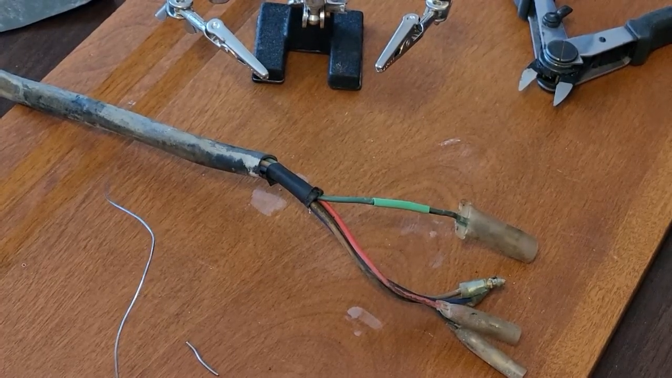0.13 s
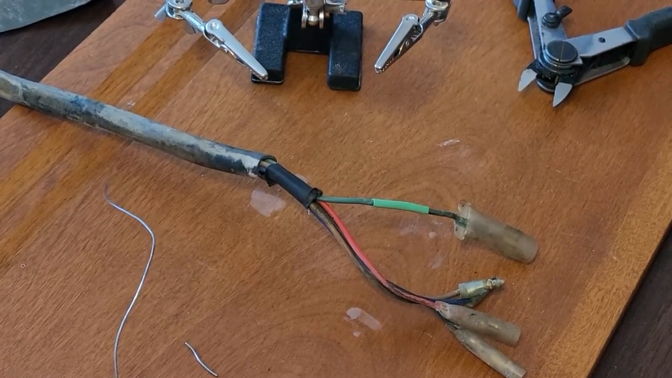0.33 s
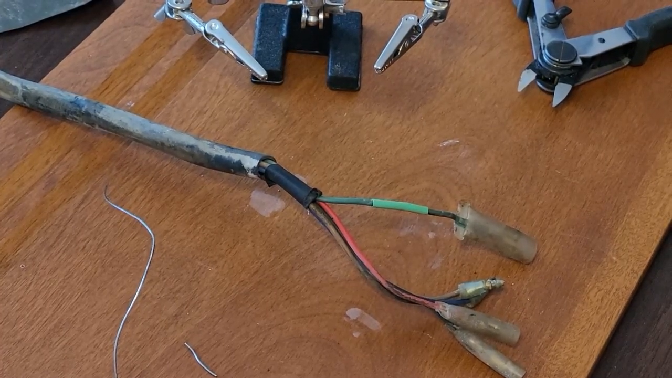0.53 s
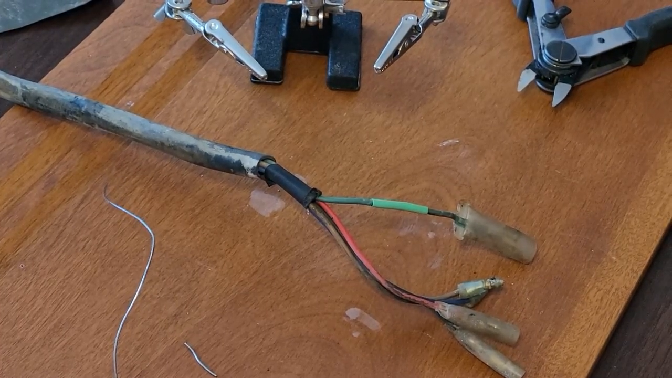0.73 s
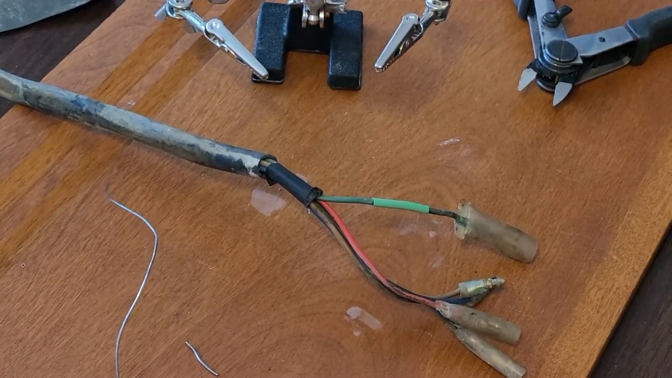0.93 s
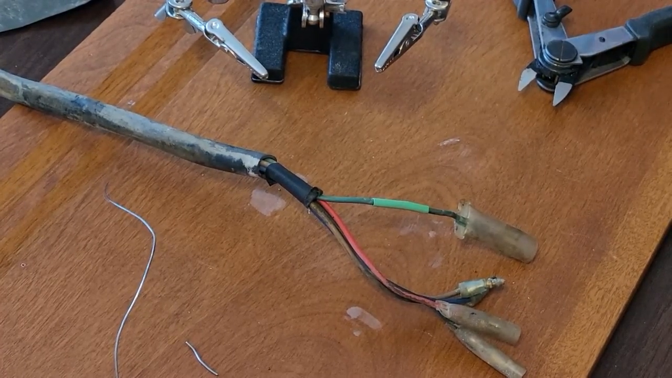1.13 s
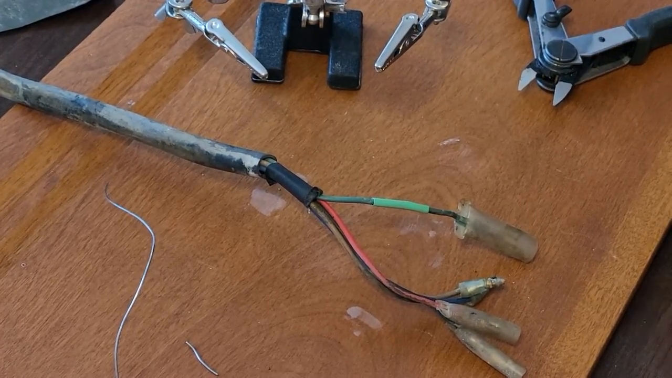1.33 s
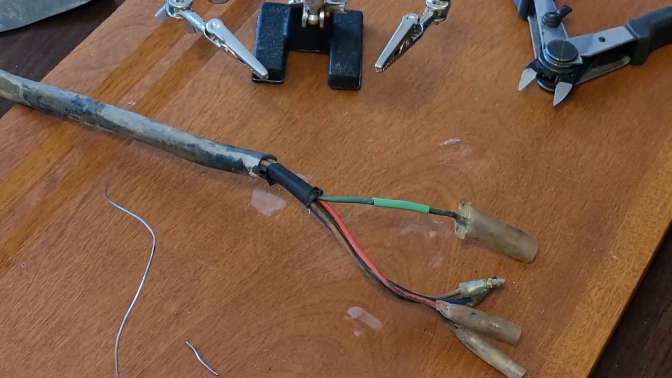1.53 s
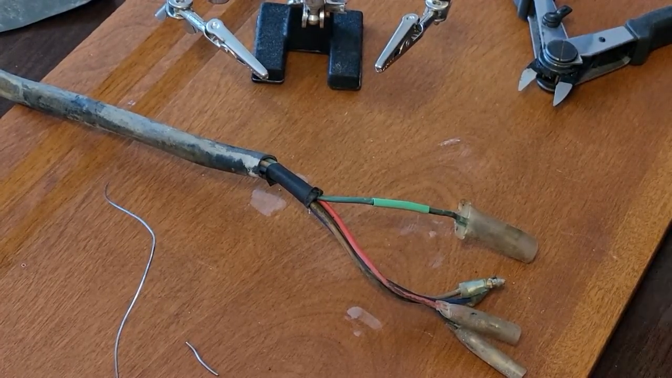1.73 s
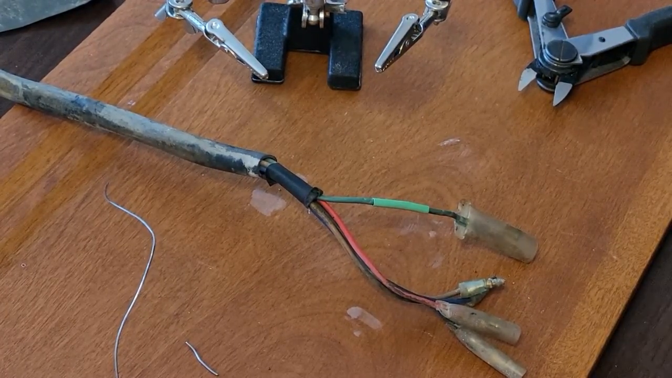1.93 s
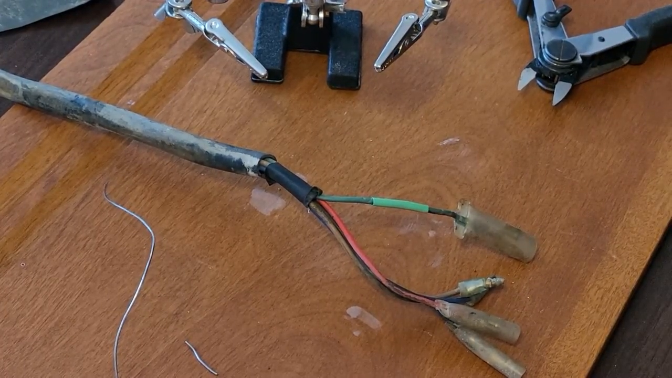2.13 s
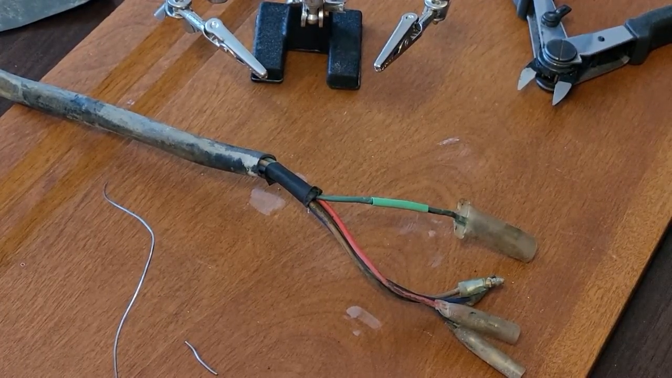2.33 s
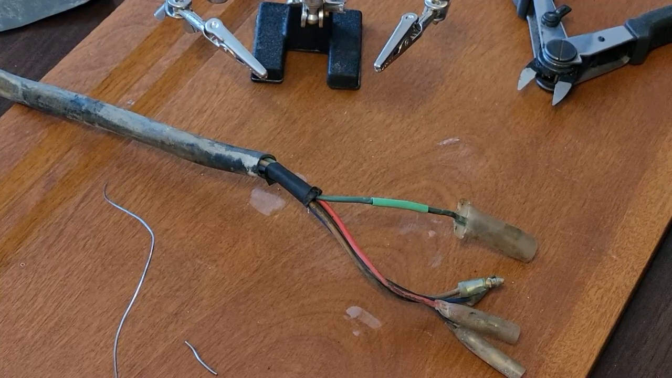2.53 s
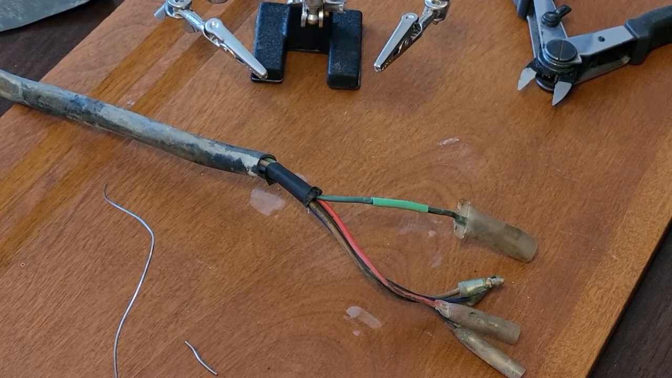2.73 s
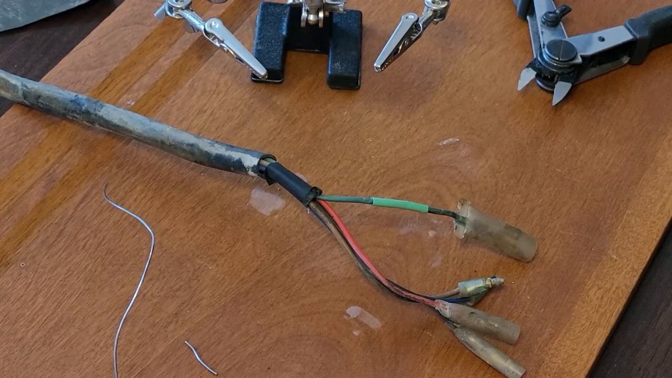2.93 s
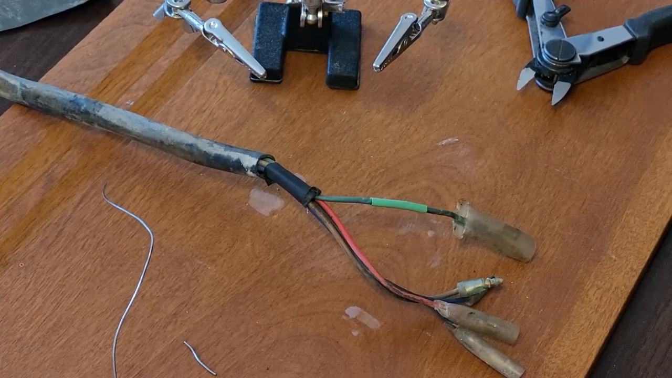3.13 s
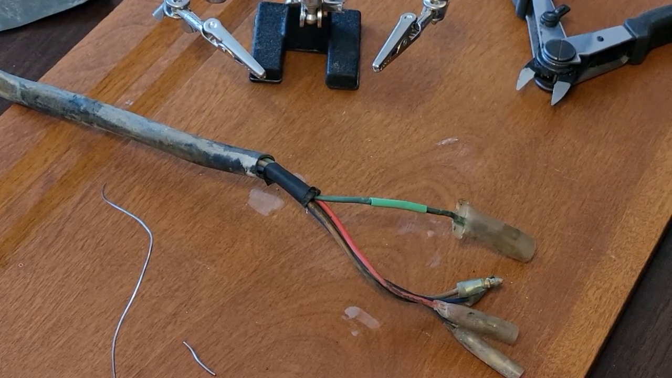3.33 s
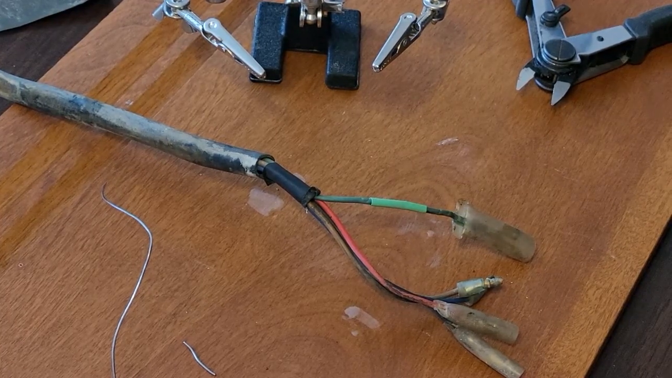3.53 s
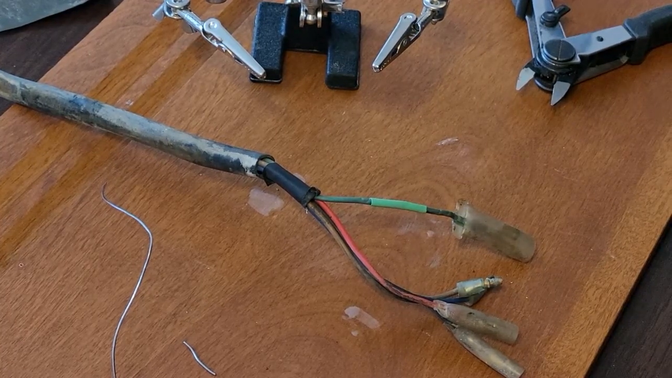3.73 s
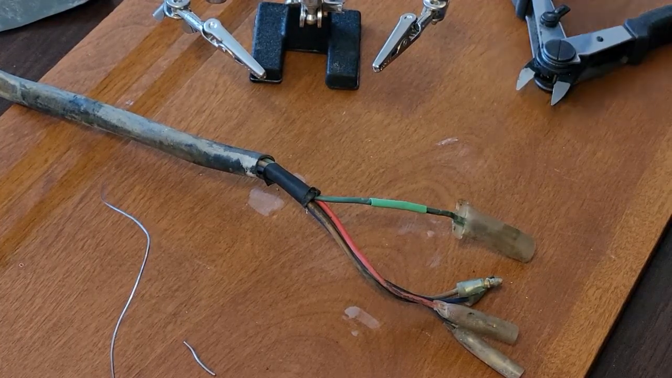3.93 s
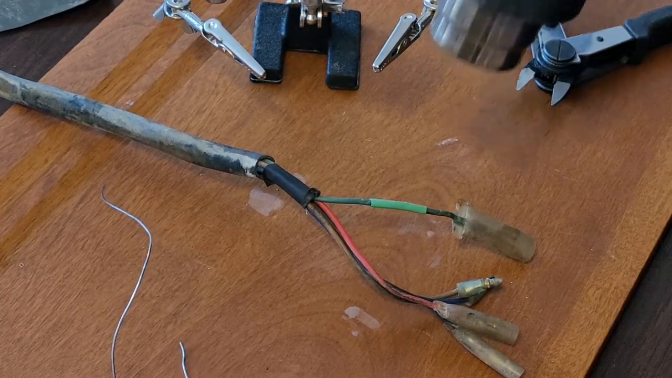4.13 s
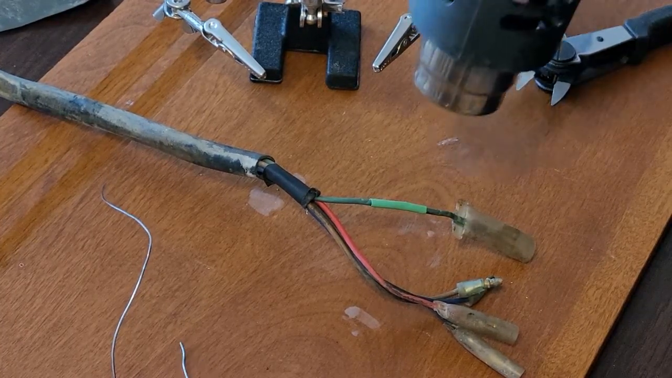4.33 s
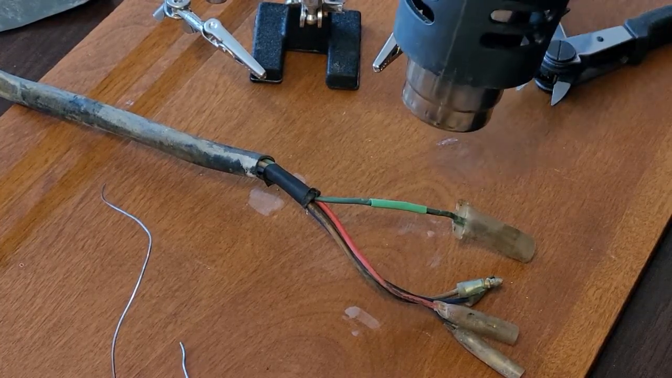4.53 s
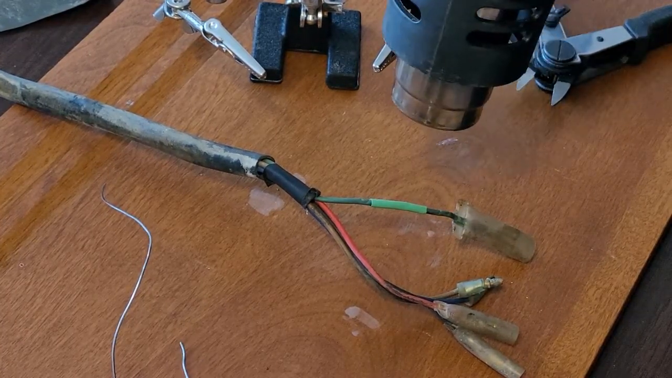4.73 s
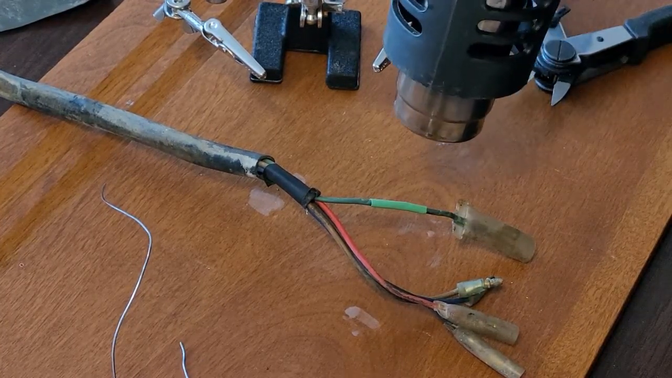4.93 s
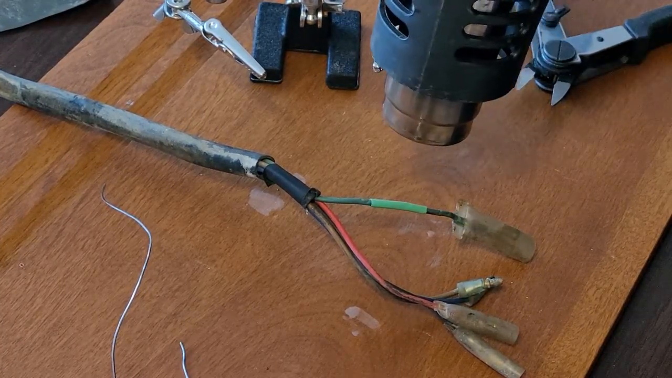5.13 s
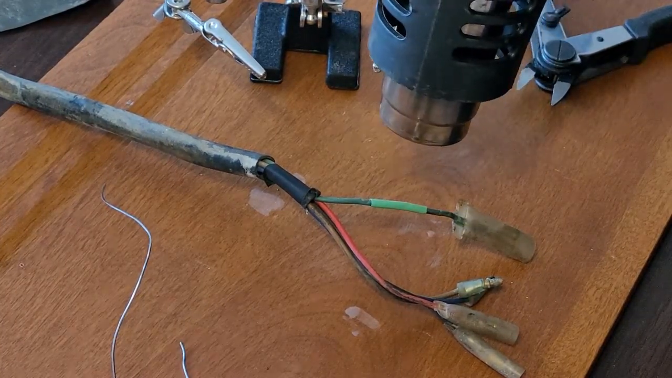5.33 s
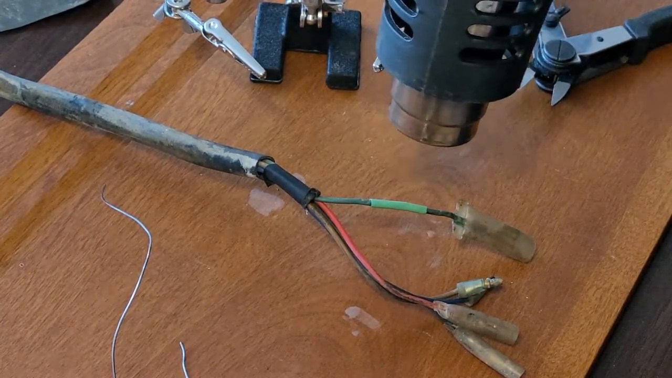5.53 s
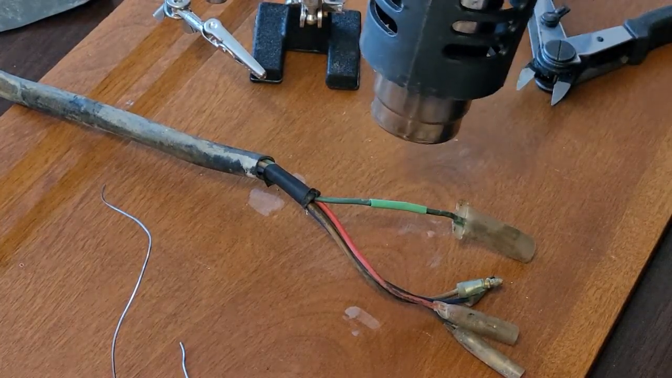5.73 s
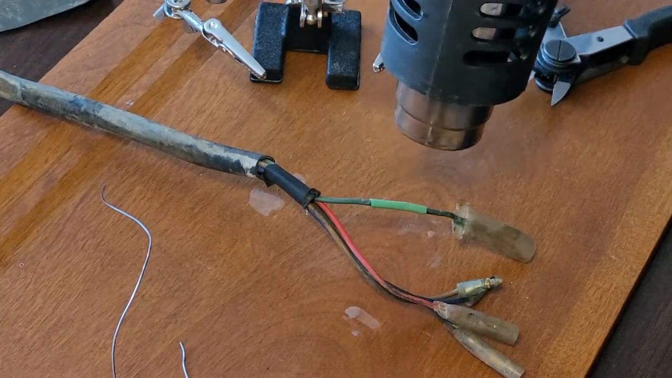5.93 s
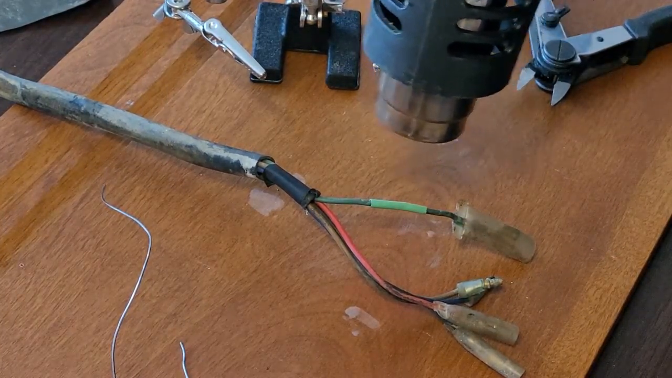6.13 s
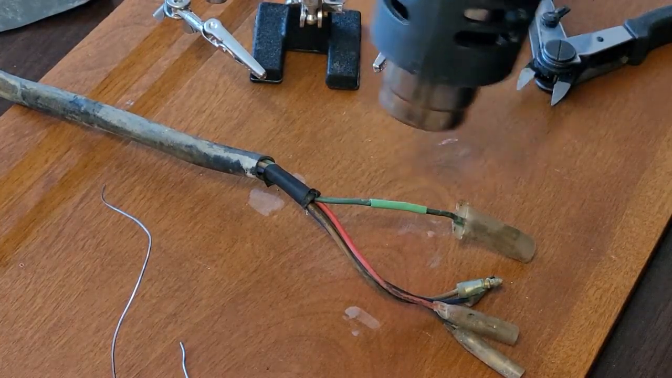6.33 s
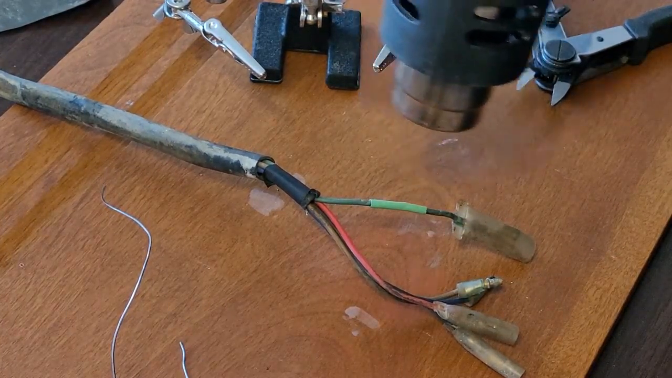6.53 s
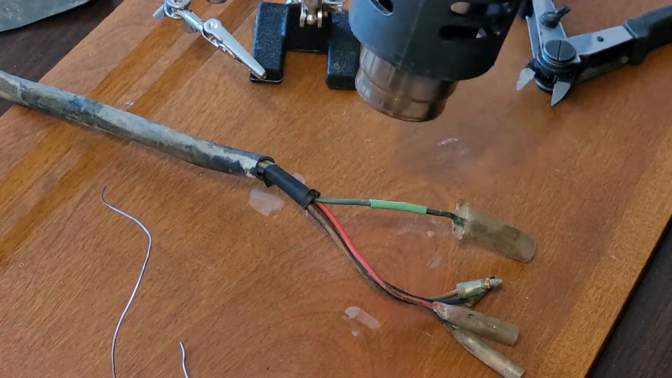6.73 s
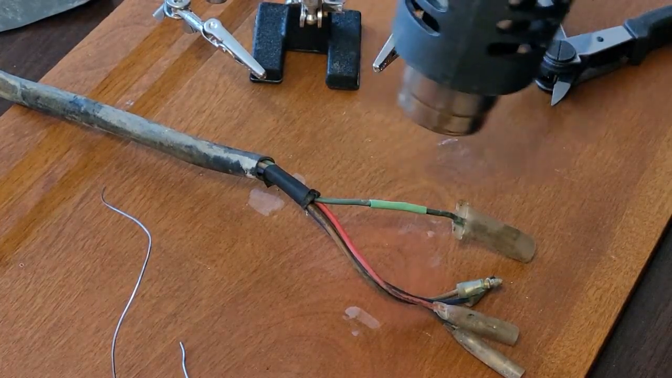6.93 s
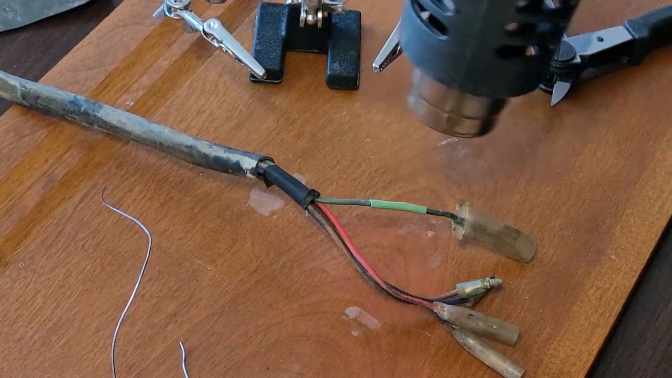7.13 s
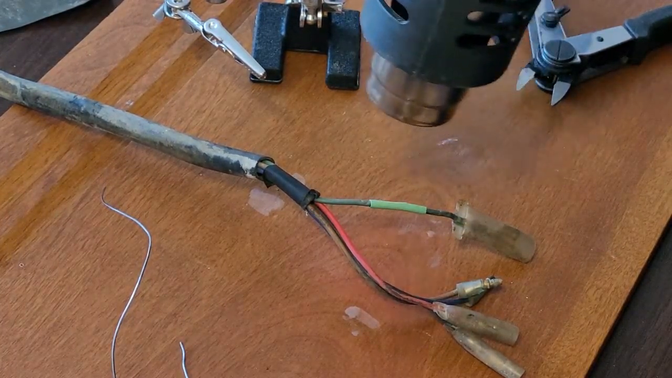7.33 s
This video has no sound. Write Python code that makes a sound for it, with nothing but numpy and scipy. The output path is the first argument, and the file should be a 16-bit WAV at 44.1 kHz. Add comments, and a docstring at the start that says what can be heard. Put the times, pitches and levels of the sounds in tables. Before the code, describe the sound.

Light knocks and rubbing as a heat gun is lifted from a wooden bench, a sharp switch click, then a fast spin-up into steady roaring hiss.

```python
"""A hot-air gun roars and hisses: coloured noise for the air, with sines for shaft hum, armature, fan blades
and brushes, all following the speed of its little brushed motor.
First the gun is picked up from a wooden bench in a small workshop: ringing knocks, dull thumps and rubbing
noise, then the switch snaps. The fan spins up and the gun is turned towards the work."""
import sys
import numpy as np
from scipy import signal
from scipy.fft import rfft, irfft, next_fast_len
from scipy.io import wavfile

SR = 44100
rng = np.random.default_rng(int(sys.argv[2]) if len(sys.argv) > 2 else 0)


def generate_wav(sig):
    """Save sig (samples, or channels by samples) to the path in sys.argv[1] as 16-bit PCM at SR."""
    pcm = np.round(np.clip(np.atleast_2d(sig).T, -1, 1) * 32767).astype(np.int16)
    wavfile.write(sys.argv[1], SR, pcm)


N = 330485
LEFT_RIGHT = np.array([[1], [-1]])   # plus on the left, minus on the right


def from_db(db):
    """Decibels to gain."""
    return 10 ** (np.asarray(db) / 20)


def rms_one(x):
    """Scales to unit rms."""
    return x / np.sqrt(np.mean(x ** 2) + 1e-20)


def in_time(rows):
    """Draws one curve per column, sample by sample."""
    s, *columns = np.transpose(rows)
    return [np.interp(np.arange(N) / SR, s, column) for column in columns]


def at_hz(points, hz):
    """Reads a table on a log-frequency axis."""
    table_hz, values = np.transpose(points)
    return np.interp(np.log(hz), np.log(table_hz), values)


def drift(rate, count):
    """Slow random curves of spread 1, one per row, one point every 64 samples; a higher rate is quicker."""
    r = np.exp(-128 * np.pi * rate / SR)
    raw = rng.standard_normal((count, N // 64 + 3002))
    slow = signal.lfilter([1], [1, -2 * r, r * r], raw)[:, 3000:]   # drop the filter's settling
    slow = slow - slow.mean(axis=1, keepdims=True)
    return slow / slow.std(axis=1, keepdims=True)


def stretch(slow, first=0):
    """Reads a slow curve at every sample from the first on."""
    return np.interp(np.arange(first, N) / 64, np.arange(len(slow)), slow)


TOP_HZ = 14600   # noise colours stay level above this


def noise(spectrum, alike, pan=((1, 0), (2, 0)), peaks=()):
    """Stereo noise of rms 1 with a colour, a left-right likeness and a balance at each frequency."""
    size = next_fast_len(N)
    hz = np.arange(size // 2 + 1) * SR / size + 1e-3
    colour_db = at_hz(spectrum, np.minimum(hz, TOP_HZ))
    for peak_hz, width_hz, db in peaks:
        colour_db = colour_db + db / (1 + (2 * (hz - peak_hz) / width_hz) ** 2)
    mid, side = rfft(rng.standard_normal((2, size)))
    likeness = np.clip(at_hz(alike, hz), -1, 1)
    half_db = at_hz(pan, hz) / 2
    pair = np.sqrt(1 + likeness) * mid + np.sqrt(1 - likeness) * side * LEFT_RIGHT
    return rms_one(irfft(pair * from_db(colour_db + half_db * LEFT_RIGHT), size)[:, :N])


def ring(clicks, hz, t60):
    """Each unit click starts a sine of starting height 1 that dies by 60 dB in t60 seconds."""
    r, w = from_db(-60 / (t60 * SR)), 2 * np.pi * hz / SR
    return signal.lfilter([0, np.sin(w)], [1, -2 * r * np.cos(w), r * r], clicks + 1e-18)


def blow(modes, soft_hz, pitch=1, detune_db=0, crack_db=-40, order=2, damping=1):
    """One blow: ringing modes plus a dying crack of noise, dulled by a soft contact; peak 1."""
    click = np.zeros(SR // 2)
    click[0] = 1
    out = np.zeros(SR // 2)
    for k, (hz, db, t60) in enumerate(modes):
        strength = from_db(db + 1.4 * rng.normal()) * (-1) ** k   # neighbours start in opposite directions
        mode_hz = hz * pitch * from_db(detune_db * rng.normal())
        out += strength * ring(click, mode_hz, t60 * damping)
    crack_fade_db = crack_db - 60 * np.arange(SR // 2) / SR / (0.03 * damping)
    out += from_db(crack_fade_db) * rng.standard_normal(SR // 2)
    sos = signal.butter(order, np.clip(soft_hz, 60, 18000), fs=SR, output="sos")
    out = signal.sosfilt(sos, out)
    return out / np.abs(out).max()


def thin(sound, low_hz):
    """Takes the bass off; peak 1."""
    sound = signal.sosfilt(signal.butter(3, low_hz, "high", fs=SR, output="sos"), sound)
    return sound / np.abs(sound).max()


def add(track, s, sound):
    """Mixes a sound in at s seconds."""
    i = round(s * SR)
    track[..., i:i + sound.shape[-1]] += sound[..., :N - i]


# The gun in the hand: (time [s], pose [number], roar at full speed [dB], hiss at full speed [dB])
# Poses: 0 fan starting, 1 held away, 2 swinging in, 3 over the work, 4 and above tilted back
GUN_IN_HAND = [(2.6, 0, -11.5, -35), (2.85, 1.1, -21.5, -29), (3.1, 2.5, -26.5, -32.5),
               (3.3, 2.5, -26, -34), (3.45, 2.5, -29, -33), (3.55, 2.5, -30.5, -28.5), (3.8, 2, -29.5, -30),
               (4.0, 2, -26, -30.5), (4.4, 3, -26, -29), (6.7, 3, -23.5, -29), (6.9, 5, -23.5, -29),
               (7.49, 4.5, -25.5, -29)]


def hold():
    """How the gun is held over time, with the roar and hiss that go with it."""
    pose, roar_db, hiss_db = in_time(GUN_IN_HAND)
    return np.clip(pose, 0, 4), roar_db, hiss_db


ON_S, SPIN_UP_S = 2.6, 0.205   # switch-on time, time constant of the spin-up
FULL_HZ, CREEP_HZ, CREEP_S = 232.0, 7.2, 2.2   # full turns per second; the last few come as the motor warms


def shaft():
    """Turns per second closing in on full speed, and how far below it in dB."""
    t = np.maximum(np.arange(N) / SR - ON_S, 1e-4)
    turns_hz = (1 - np.exp(-t / SPIN_UP_S)) * (FULL_HZ - CREEP_HZ * np.exp(-t / CREEP_S))
    return turns_hz, 20 * np.log10(turns_hz / FULL_HZ)


# Colour of the air in each pose: (frequency [Hz], level [dB per Hz])
STARTING_COLOUR = [(180, -71), (300, -48), (461, -29), (562, -8), (794, -11), (937, -20), (1020, -7),
                   (1110, -15), (1490, -28), (2880, -14), (4490, -38), (6570, -16), (15500, -37)]
AWAY_COLOUR = [(180, -50), (300, -55), (610, -10), (663, -6), (821, 1.5), (892, -7), (1300, -5.5),
               (1590, -15), (1840, -12), (2320, -6.5), (4000, -12.5), (7250, -8), (11000, -9.5),
               (14500, -8)]
SWINGING_COLOUR = [(180, -44), (300, -24.5), (849, -5), (1050, -10.5), (1280, -8), (1350, -9), (2320, -13),
                   (3340, -16.5), (4570, -18.5), (9930, -20.5), (11000, -28), (12900, -16.5),
                   (15500, -25.5)]
NEAR_COLOUR = [(150, -34.5), (300, -14.5), (480, -7), (650, -6), (1000, -3.5), (1350, -10.5), (1500, -5.5),
               (2300, -16.5), (3500, -13), (4700, -19.5), (5600, -15.5), (8000, -22), (11000, -25),
               (14600, -33.5)]
# Low turbulence round the casing: (frequency [Hz], level [dB per Hz])
BUFFET_COLOUR = [(20, -12), (60, -33), (100, -24), (150, -8.5), (300, -4), (420, -5.5), (800, -56)]
# Resonances heard from behind the gun: (frequency [Hz], width [Hz], level [dB])
INLET_PEAKS = [(786, 120, 5), (1760, 180, 5), (2640, 37, 13.5), (3310, 210, 8.5), (3750, 300, 6.5),
               (6100, 550, 3.5), (14700, 1200, 2.5)]
# Resonances of the near air, the last one lost on tilting back: (frequency [Hz], width [Hz], level [dB])
BARREL_PEAKS = [(739, 34, 4.5), (853, 310, 10.5), (1171, 154, 12), (1308, 62, 14), (1600, 59, -6.5),
                (1670, 49, 3), (2540, 39, 8.5), (2718, 143, 7.5), (14900, 1200, 11), (6530, 630, 2),
                (12900, 710, 11), (4145, 350, 12)]
# How alike the air is on both sides: (frequency [Hz], left-right likeness [-1 to 1])
AWAY_LIKENESS = [(60, 0.59), (150, 0.77), (380, 0.95), (950, 0.2), (2380, 0.61), (5980, 0.11),
                 (15000, 0.16)]
NEAR_LIKENESS = [(60, 0.87), (120, 1), (240, 0.99), (480, 0.92), (950, 0.82), (1890, 0.46), (3770, 0.52),
                 (7520, 0.73), (15000, 1)]
# Which side the air leans to: (frequency [Hz], left minus right [dB])
AWAY_BALANCE = [(60, 2), (150, 4), (380, -5), (950, -1.5), (2380, 1), (5980, 1.5), (15000, 2.5)]
NEAR_BALANCE = [(60, 7), (100, -14), (180, 33), (310, 0), (550, -2), (950, -2), (1650, 3), (2860, 2),
                (4970, 2.5), (8640, 5), (15000, -1)]
ROAR_LAW, HISS_LAW = 3.38, 2.44   # dB lost per dB of missing speed
HISS_START_DB = -7.5   # from first contact the brushes hiss as the air would this far below full speed
HISS_THROB = 0.083     # the hiss pulses once a turn by this share


def air(pose, roar_db, hiss_db):
    """Turbulent air from inlet and nozzle: noise whose colour crosses over from pose to pose."""
    turns_hz, slow_db = shaft()
    throb = 1 + HISS_THROB * np.sin(2 * np.pi * np.cumsum(turns_hz) / SR)
    roar_db = roar_db + ROAR_LAW * slow_db
    hiss_db = hiss_db + HISS_LAW * np.maximum(slow_db, HISS_START_DB)
    colours = [noise(STARTING_COLOUR, AWAY_LIKENESS, AWAY_BALANCE),
               noise(AWAY_COLOUR, AWAY_LIKENESS, AWAY_BALANCE, INLET_PEAKS),
               noise(SWINGING_COLOUR, AWAY_LIKENESS, AWAY_BALANCE, INLET_PEAKS),
               noise(NEAR_COLOUR, NEAR_LIKENESS, NEAR_BALANCE, BARREL_PEAKS),
               noise(NEAR_COLOUR, NEAR_LIKENESS, NEAR_BALANCE, BARREL_PEAKS[:-1])]
    out = from_db(roar_db - 30) * noise(BUFFET_COLOUR, NEAR_LIKENESS)
    gusts = drift(20.0, count=2)
    # roar below 2200 Hz, hiss above
    for kind, level_db, gust, pulse in (("low", roar_db, gusts[0], 1), ("high", hiss_db, gusts[1], throb)):
        sos = signal.butter(4, 2200, kind, fs=SR, output="sos")
        blend = np.zeros((2, N))
        for k, colour in enumerate(colours):
            share = np.sqrt(np.clip(1 - np.abs(pose - k), 0, 1))
            blend += share * rms_one(signal.sosfilt(sos, colour))
        out += from_db(level_db + 1.0 * stretch(gust)) * blend * pulse
    return out * (np.arange(N) > ON_S * SR)


# Echo off the bench top, shortening as the gun comes down: (time [s], delay [ms], level [dB])
BENCH_TOP_ECHO = [(2.9, 1.3, -10), (3.45, 1.12, -14), (3.65, 0.8, -32), (3.85, 0.82, -14),
                  (3.95, 0.67, -20), (4.1, 0.524, -10), (4.3, 0.38, -15), (4.55, 0.35, -12.5)]
# Air reaching the left side late: (pose [number], left lag [ms])
LEFT_AIR_LAG = [(1.2, 0.33), (2.1, 0.0067)]


def bench_echo(x, pose):
    """Adds a slightly late copy, later on the right; the left side lags while the gun is off to the side."""
    late_ms, echo_db = in_time(BENCH_TOP_ECHO)
    now = np.arange(N)
    late = [np.interp(now - late_ms * longer * SR / 1000, now, channel)
            for channel, longer in zip(x, (1, 1.04))]
    left, right = (x + from_db(echo_db) * np.array(late)) / np.sqrt(1 + from_db(2 * echo_db))
    lag = np.round(np.interp(pose, *np.transpose(LEFT_AIR_LAG)) * SR / 1000).astype(int)
    return np.array([left[np.maximum(now - lag, 0)], right])


# Rms level of the motor tones at full speed as the gun is moved:
# (time [s], unbalance hum [dB], armature at 3 times the shaft [dB], blades at 6 times the shaft [dB])
MOTOR_TONES = [(2.68, -45, -60, -45), (2.8, -45, -54, -30), (3.0, -36, -42, -33), (3.2, -30, -39, -31.5),
               (3.42, -32, -40, -36), (3.52, -33, -39, -28), (3.68, -34, -39, -31), (3.79, -35, -44, -40),
               (3.87, -35, -43, -30), (4.0, -35, -42.5, -30.5), (4.4, -36.5, -37, -32),
               (5.1, -37.5, -36, -34), (5.8, -38, -33.5, -34), (6.6, -38.5, -35.5, -33),
               (7.49, -39, -33.5, -34.5)]
# The tone at 7 times the shaft, showing while the inlet sweeps past: (time [s], level [dB])
SEVENTH_TONE = [(3.2, -49), (3.4, -41), (3.61, -33), (3.75, -41), (3.9, -46), (4.1, -43), (4.3, -42),
                (4.5, -57)]
HUM_LAW, ARMATURE_LAW, BLADE_LAW = 4.5, 3.5, 2.6   # dB lost per dB of missing speed


def shaft_tones(pose, phase, slow_db):
    """Sines locked to the shaft; their left and right phases change as the gun turns."""
    hum_db, armature_db, blade_db = in_time(MOTOR_TONES)
    seventh_db = in_time(SEVENTH_TONE)[0]
    near = np.clip(pose - 2, 0, 1)
    first_waver, second_waver = [stretch(curve) for curve in from_db(2.3 * drift(14.0, count=2))]
    hum = from_db(hum_db + HUM_LAW * slow_db) * np.sin(phase + 0.032 * LEFT_RIGHT)
    armature_gain = from_db(armature_db + ARMATURE_LAW * slow_db - 2.2 * LEFT_RIGHT * near)
    armature = first_waver * armature_gain * np.sin(3 * phase + 0.35 * LEFT_RIGHT * (1 - near))
    blade_gain = second_waver * from_db(blade_db + BLADE_LAW * slow_db)
    blades = blade_gain * np.sin(6 * phase + LEFT_RIGHT * (0.4 - 1.655 * near))
    seventh_gain = first_waver * from_db(seventh_db + BLADE_LAW * slow_db)
    seventh = seventh_gain * np.sin(7 * phase + 0.5 * LEFT_RIGHT)
    return np.sqrt(2) * (hum + armature + blades + seventh)


# Strong brush and commutator lines at full speed, before BRUSH_DB is added:
# (multiple of the shaft speed [number], left [dB], right [dB])
BRUSH_LINES = [(9, -43, -46), (11, -50, -50), (12, -48, -47), (18, -43, -54), (20, -46, -50),
               (21, -50, -45), (22, -48, -56), (24, -49, -55), (25, -47, -50), (28, -48, -58),
               (33, -50, -56), (35, -52, -59), (36, -48, -57), (39, -51, -60), (40, -48, -57),
               (41, -48, -58), (42, -52, -61), (43, -50, -59), (44, -45, -53), (47, -53, -56),
               (54, -48, -58), (56, -41, -52), (57, -43, -53), (58, -49, -58), (59, -51, -58),
               (60, -48, -54), (62, -43, -49), (64, -47, -52), (65, -45, -50), (66, -44, -51),
               (68, -50, -58)]
BRUSH_REST_DB = (-55, -59)   # all other multiples from 7 to 68: left, right
BRUSH_DB, BRUSH_LAW = 1.1, 3.2   # lift of all lines; dB lost per dB of missing speed
# The strong lines come forward as the vents face the microphones: (start [s], end [s])
LINES_FORWARD_S = (3.5, 4.1)


def brush_lines(phase, slow_db):
    """A comb of sines from brushes and commutator, swelling and fading apart on each side."""
    forward = np.interp(np.arange(0, N, 64) / SR, LINES_FORWARD_S, (0, 1))
    strong = {order: both for order, *both in BRUSH_LINES}
    fade, turn = drift(4.0, count=124)[:, :len(forward)], drift(3.5, count=124)
    lines, on = np.zeros((2, N)), round(ON_S * SR)
    for k in range(124):   # 62 multiples on two sides
        order, side = 7 + k // 2, k % 2
        rest_db = BRUSH_REST_DB[side]
        strong_db = strong.get(order, BRUSH_REST_DB)[side]
        level_db = rest_db + forward * (strong_db - rest_db)
        gain = stretch(from_db(level_db + 3.2 * fade[k]), on)
        lines[side, on:] += gain * np.sin(order * phase[on:] + stretch(2.03 * turn[k], on))
    return np.sqrt(2) * from_db(BRUSH_DB + BRUSH_LAW * slow_db) * lines


def motor(pose):
    """The turning shaft drives both the low tones and the brush lines."""
    turns_hz, slow_db = shaft()
    phase = 2 * np.pi * np.cumsum(turns_hz) / SR
    return shaft_tones(pose, phase, slow_db) + brush_lines(phase, slow_db)


# Finger ticks on the switch, then the snap: (time [s], peak level [dB])
SWITCH_CLICKS = [(2.1354, -38), (2.5053, -41), (2.5717, -40), (2.598, -33), (2.601, -34), (2.6018, -14.5)]
# Ringing of the switch rocker: (frequency [Hz], level [dB], time to die by 60 dB [s])
ROCKER_MODES = [(753, -23, 0.04), (1010, -23, .03), (1900, -7, 0.016), (2260, -13, 0.024),
                (2800, -5, 0.013), (3240, -8, 0.0088), (4030, -10, 0.005), (6000, -7.5, 0.003),
                (8600, -11, 0.004), (11900, -10, 0.0035), (15000, -7, .003)]
IN_HAND_LOW_HZ = 556   # bass edge of clicks and knocks with the gun in the hand
SWITCH_LAG_MS = 0.31   # held further right by then, so the left hears it later


def switch(play):
    """Sharp clicks set the little rocker ringing."""
    for s, peak_db in SWITCH_CLICKS:
        click = thin(blow(ROCKER_MODES, soft_hz=13000, crack_db=-15.5), IN_HAND_LOW_HZ)
        play(s, from_db(peak_db) * click, room_db=-6.5, lag_ms=SWITCH_LAG_MS)


# Knocks of gun and tools: (time [s], peak level [dB], sharpness [Hz], level sent to the room [dB])
CASING_KNOCKS = [(0.072, -28.5, 3520, -4.5), (.080, -28, 2600, 0.5), (.098, -37, 2600, -2),
                 (0.277, -26.5, 3420, 0), (.284, -31, 3440, -5), (.297, -40, 3500, -7),
                 (.481, -45.5, 2700, 5), (0.546, -28.5, 4450, -3), (.554, -28.5, 3400, -3),
                 (.572, -37, 3000, 0), (.611, -47, 2500, -4), (1.408, -30.5, 1900, -8),
                 (1.436, -41, 2000, 0), (1.894, -40, 2800, 3.5), (1.953, -33, 2300, -6),
                 (1.9695, -20, 2200, -12), (2.015, -29, 3000, -2), (2.211, -41, 2400, -4),
                 (2.354, -35, 3340, 0)]
# Ringing of the casing: (frequency [Hz], level [dB], time to die by 60 dB [s])
CASING_MODES = [(513, -13, 0.0099), (704, -4.5, 0.026), (900, -10.5, 0.018), (1110, -3.5, 0.015),
                (1313, 0, 0.029), (1500, -5.5, 0.022), (1690, -3.5, .015), (2030, -6.5, .015),
                (2330, -13, 0.015), (2600, -9.5, 0.034), (3045, -7, 0.019), (3400, -5.5, 0.016),
                (4300, -16, 0.0076), (6000, -22, .004)]
LIFTED_S, ON_BENCH_LOW_HZ = 1.8, 250   # once off the bench the knocks lose more bass
HAND_DAMPING = 0.55   # a gripped casing rings for this share of its free time
TICK_DB, TICK_LOW_HZ = -21.5, 3000   # bright edge of each knock, relative to its body


def knocks(play):
    """Hard contacts ring the casing, each with a bright tick at its edge."""
    for s, peak_db, sharp_hz, room_db in CASING_KNOCKS:
        damping, low_hz = (HAND_DAMPING, IN_HAND_LOW_HZ) if s > LIFTED_S else (1, ON_BENCH_LOW_HZ)
        body = blow(CASING_MODES, sharp_hz, detune_db=0.22, crack_db=-10.0, order=4, damping=damping)
        tick = thin(blow(CASING_MODES, soft_hz=15000, crack_db=-2.0), TICK_LOW_HZ)
        play(s, from_db(peak_db) * thin(body + from_db(TICK_DB) * tick, low_hz), room_db)


# Thumps through the bench top: (time [s], peak level [dB], pitch factor [ratio], sharpness [Hz])
BENCH_THUMPS = [(.008, -37.5, 1, 300), (.09, -43, 1.3, 400), (0.611, -26.5, 0.93, 900),
                (0.699, -40, 1.17, 300), (0.811, -48, 0.8, 220), (0.926, -48.5, 0.79, 180),
                (1.381, -47, 3.1, 600), (1.405, -33, 2.8, 900), (1.478, -33, 0.59, 109),
                (1.55, -54, 1.15, 110), (1.955, -42, 0.555, 300), (2.027, -49, 1.06, 200),
                (2.947, -32, 1.65, 450), (2.976, -32, 1.24, 300), (3.801, -51, .9, 120)]
# Ringing of the bench top: (frequency [Hz], level [dB], time to die by 60 dB [s])
BENCH_MODES = [(73.3, -7.5, 0.32), (129, -2.5, 0.16), (247, -3, 0.072), (411, -13, 0.08), (630, -8, 0.06)]


def thumps(play):
    """Soft blows ring the bench top; those pitched above 1 die sooner."""
    for s, peak_db, pitch, sharp_hz in BENCH_THUMPS:
        thump = blow(BENCH_MODES, sharp_hz, pitch, damping=min(1, pitch ** -2))
        play(s, from_db(peak_db) * thump, room_db=-0.5)


# The casing drags against hand and cable:
# (loudest time [s], rise [s], fall by 20 dB [s], level [dB], pitch factor [ratio], sharpness [Hz])
CASING_DRAGS = [(.23, 0.013, .03, -53, 1.02, 1800), (1.99, .015, 0.046, -40.5, .95, 2550),
                (2.024, 0.016, .05, -33, 1.09, 3800), (2.06, .02, 0.062, -46, 1.02, 1600),
                (2.225, 0.015, 0.051, -52, 1.05, 2510), (2.298, .014, .06, -49, 1.02, 1600),
                (2.36, 0.0087, 0.028, -44, 1.22, 3200)]
SLIPS_PER_S = 1500   # average number of tiny slips


def drag(rise, fall, pitch, sharp_hz):
    """Uneven slips ring the casing under a quick swell; rms about 1 at its loudest."""
    t = np.arange(SR // 4) / SR
    slips = (rng.random(len(t)) < SLIPS_PER_S / SR) * rng.standard_normal(len(t))
    slips = slips * from_db(1.5 * rng.exponential(1, len(t)))
    body = sum(from_db(db) * (-1) ** k * ring(slips, hz * pitch, t60)
               for k, (hz, db, t60) in enumerate(CASING_MODES))
    sos = signal.butter(4, np.clip(sharp_hz, 300, 9000), fs=SR, output="sos")
    swell = np.where(t < rise, t / rise, from_db(-20 * (t - rise) / fall))
    return rms_one(signal.sosfilt(sos, body)) * swell


def drags(play):
    """Places each run of slips so that it is loudest at its listed time."""
    for s, rise, fall, level_db, pitch, sharp_hz in CASING_DRAGS:
        play(s - rise, from_db(level_db) * drag(rise, fall, pitch, sharp_hz), room_db=-3.5)


# The hollow handle pops as the grip shifts: (time [s], peak level [dB])
HANDLE_POPS = [(1.852, -51), (1.903, -43), (2.038, -35), (2.066, -54), (2.288, -47), (2.351, -39),
               (2.372, -39), (2.403, -37), (2.418, -52), (2.436, -62)]
# Ringing of the handle: (frequency [Hz], level [dB], time to die by 60 dB [s])
HANDLE_MODES = [(715, -3.5, 0.025), (920, -2.5, 0.015), (1490, -16, 0.013)]


def pops(play):
    """Dull, short blows ring the hollow handle."""
    for s, peak_db in HANDLE_POPS:
        pop = blow(HANDLE_MODES, soft_hz=1800, detune_db=0.3)
        play(s, from_db(peak_db) * pop, room_db=-8)


HAND_LAG_MS = 0.11   # lifted on the right: the left microphone hears it later


def handling():
    """Mixes every contact sound, both dry and through the room."""
    dry, wet = np.zeros((2, N)), np.zeros(N)

    def play(s, sound, room_db, lag_ms=HAND_LAG_MS):
        """Sends a sound straight to both sides and a share to the room; no lag in the first second."""
        add(dry[0], s + lag_ms / 1000 * (s > 1), sound)
        add(dry[1], s, sound)
        add(wet, s, from_db(room_db) * sound)

    knocks(play)
    drags(play)
    pops(play)
    switch(play)
    thumps(play)
    return dry + room(wet)


# Hands and cable rubbing, each rub a swell:
# (loudest time [s], length [s], low rumble [dB], scrape [dB], fine rustle [dB])
RUB_SWELLS = [(0.0, 0.55, -50.5, -54, -64.5), (0.289, 0.33, -53, -52, -64.5),
              (0.609, 0.22, -48.5, -46, -58.5), (0.853, 0.15, -63, -60.5, -74), (1.218, 1, -66, -84, -67),
              (1.46, 0.22, -49, -55, -64), (1.817, 0.44, -61.5, -56.5, -59), (2.028, 0.24, -65, -65, -54.5),
              (2.283, 0.57, -74, -57.5, -69)]
# Level between rubs: (rumble [dB], scrape [dB], rustle [dB])
BETWEEN_RUBS_DB = (-68, -65.5, -69.5)
# Colours of the three rubbing noises: (frequency [Hz], level [dB per Hz])
RUMBLE_COLOUR = [(15, -14), (40, 3.5), (90, -5.5), (150, -8), (250, -8), (350, -4.5), (500, -9), (700, -57)]
SCRAPE_COLOUR = [(180, -52), (280, -21), (400, -9), (515, -2.5), (707, 1), (817, -6), (1300, -8),
                 (1700, -4.5), (1850, -9.5), (3000, -11), (3900, -65), (6600, -120)]
RUSTLE_COLOUR = [(1180, -40), (2000, -13), (2220, -7), (2790, -1), (4110, -1.5), (6500, -7.5), (13300, -17),
                 (15500, -21)]
# How alike the rubbing is on both sides: (frequency [Hz], left-right likeness [-1 to 1])
RUB_LIKENESS = [(60, 0.75), (180, 0.79), (550, 0.66), (1650, -0.3), (4970, 0.21), (15000, 0.96)]


def rubbing():
    """Friction noise: rumble, scrape and rustle swell together, each with its own random lumps."""
    power = from_db(2 * np.array(BETWEEN_RUBS_DB))[:, None] * np.ones(N)
    for s, length, *levels_db in RUB_SWELLS:
        swell = np.cos(np.pi * np.clip((np.arange(N) / SR - s) / length, -.5, .5)) ** 2
        power = power + from_db(2 * np.array(levels_db))[:, None] * swell ** 2
    rumble, scrape, rustle = np.sqrt(power)
    lumps = drift(28.0, count=3)
    return (rumble * from_db(1.8 * stretch(lumps[0])) * noise(RUMBLE_COLOUR, RUB_LIKENESS)
            + scrape * from_db(1.5 * stretch(lumps[1])) * noise(SCRAPE_COLOUR, RUB_LIKENESS)
            + rustle * from_db(1.6 * stretch(lumps[2])) * noise(RUSTLE_COLOUR, RUB_LIKENESS, AWAY_BALANCE))


# A faint narrow squeak: (start [s], end [s], frequency [Hz], width [Hz], level [dB])
FAINT_SQUEAK = (1.17, 1.32, 1670, 70, -67)


def squeak():
    """Noise through a narrow resonance, swelling and fading."""
    start, end, hz, width_hz, level_db = FAINT_SQUEAK
    sos = signal.butter(2, [hz - width_hz / 2, hz + width_hz / 2], "band", fs=SR, output="sos")
    swell = np.sin(np.pi * np.clip((np.arange(N) / SR - start) / (end - start), 0, 1))
    tone = rms_one(signal.sosfilt(sos, rng.standard_normal(N)))
    return from_db(level_db) * np.sqrt(np.abs(swell)) * tone


# How long the room rings: (frequency [Hz], time to die by 60 dB [s])
ROOM_RINGING = [(200, 0.084), (1200, 0.3), (4000, 0.2), (12000, 0.015)]


def room(x):
    """Diffuse tail: octave bands of noise dying at their own rate, unrelated on each side."""
    t, tail = np.arange(SR // 2) / SR, 0
    for low in 90 * 2.0 ** np.arange(8):
        sos = signal.butter(2, [low, min(2 * low, 19000)], "band", fs=SR, output="sos")
        band = signal.sosfilt(sos, rng.standard_normal((2, len(t))))
        tail = tail + band * from_db(-60 * t / at_hz(ROOM_RINGING, np.sqrt(2) * low))
    tail = tail * np.minimum(t / 0.002, 1)
    tail = tail / np.sqrt(np.sum(tail ** 2) / 2)
    return signal.fftconvolve(x[None], tail, axes=1)[:, :N]


def scene():
    """The gun is handled, then its motor and air start; all layers are summed."""
    pose, roar_db, hiss_db = hold()
    contacts = handling() + rubbing() + squeak()
    return contacts + motor(pose) + bench_echo(air(pose, roar_db, hiss_db), pose)


BASS_EDGE_HZ, TREBLE_EDGE_HZ = 44.4, 15730


def record(dry):
    """The deepest bass is thinned and the top is cut steeply."""
    dry = signal.sosfilt(signal.butter(2, BASS_EDGE_HZ, "high", fs=SR, output="sos"), dry)
    return signal.sosfilt(signal.ellip(14, .5, 70, TREBLE_EDGE_HZ, fs=SR, output="sos"), dry)


dry = scene()
out = record(dry)
generate_wav(out)
```